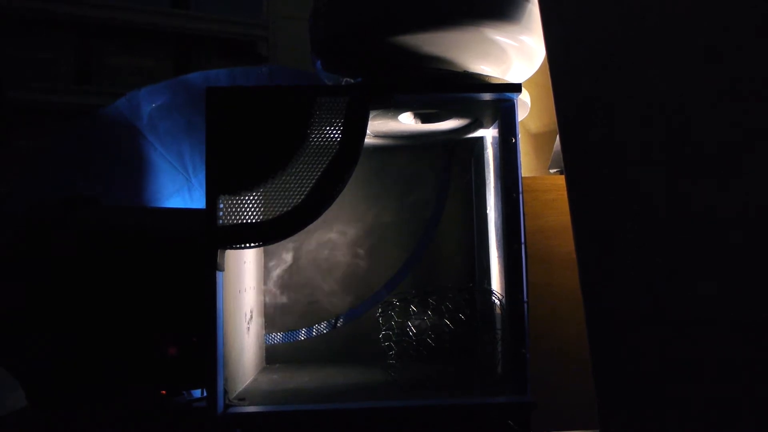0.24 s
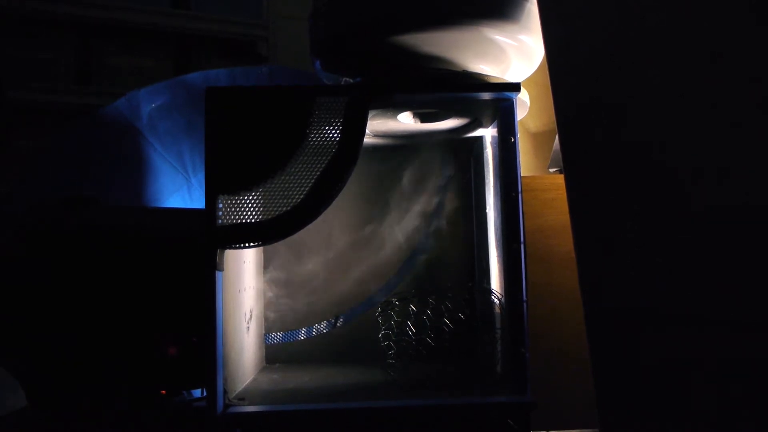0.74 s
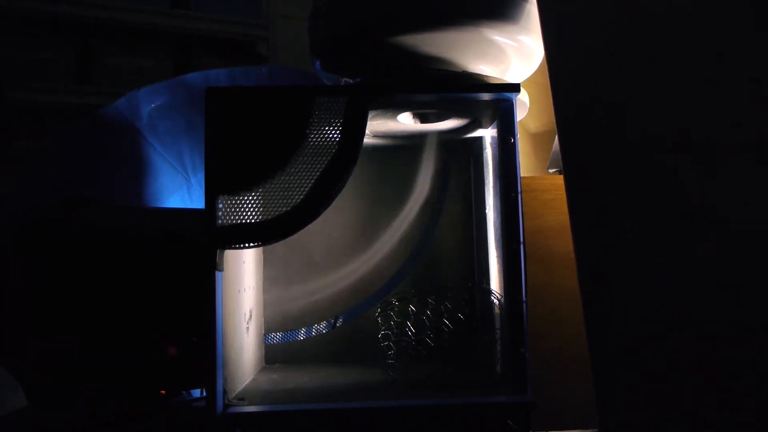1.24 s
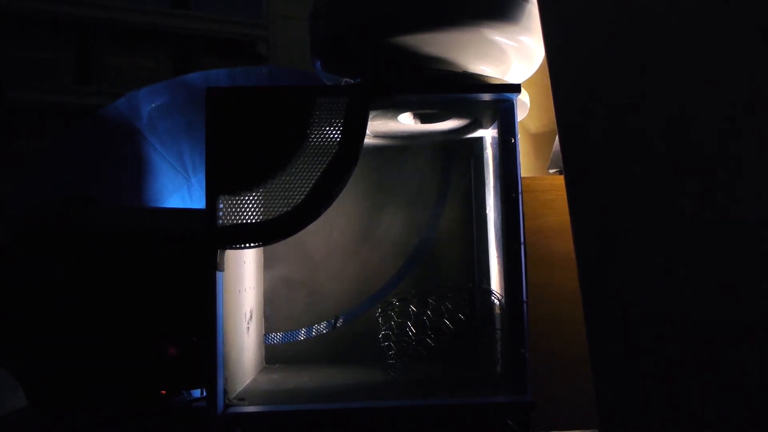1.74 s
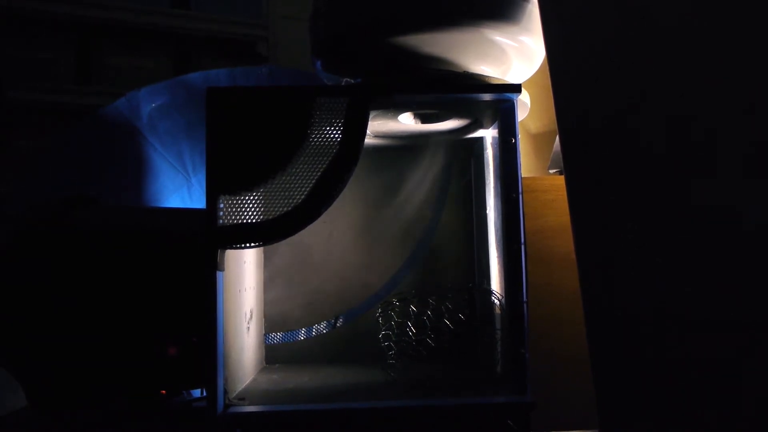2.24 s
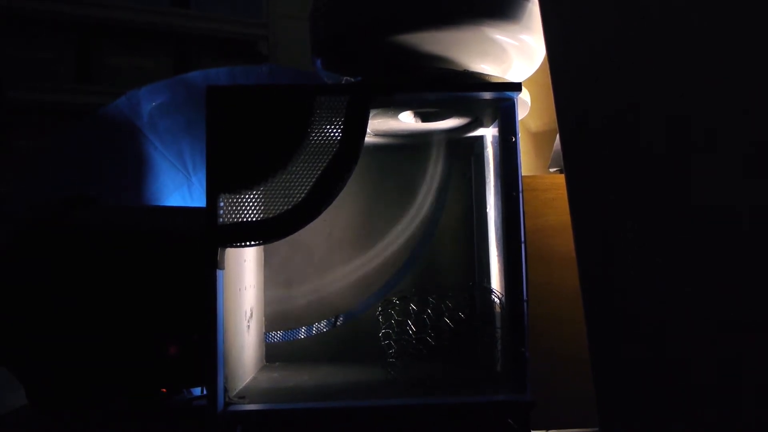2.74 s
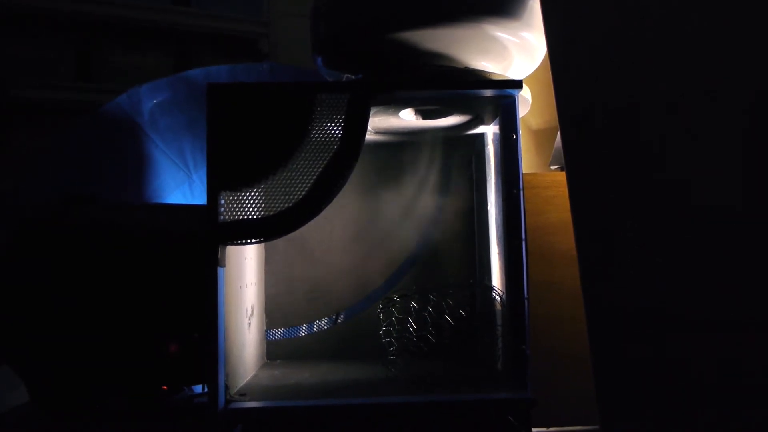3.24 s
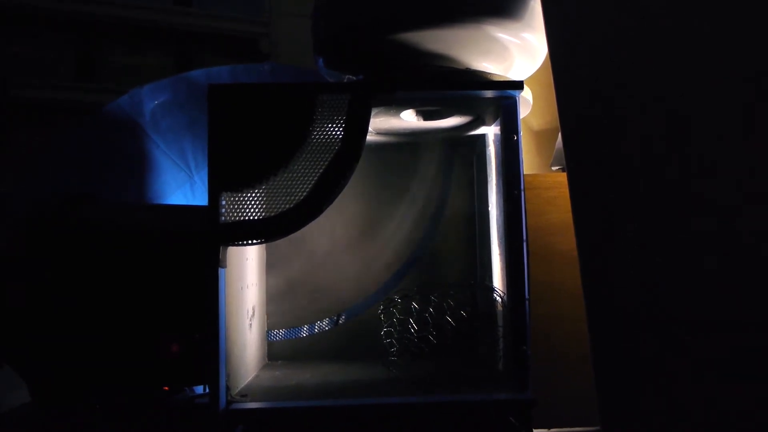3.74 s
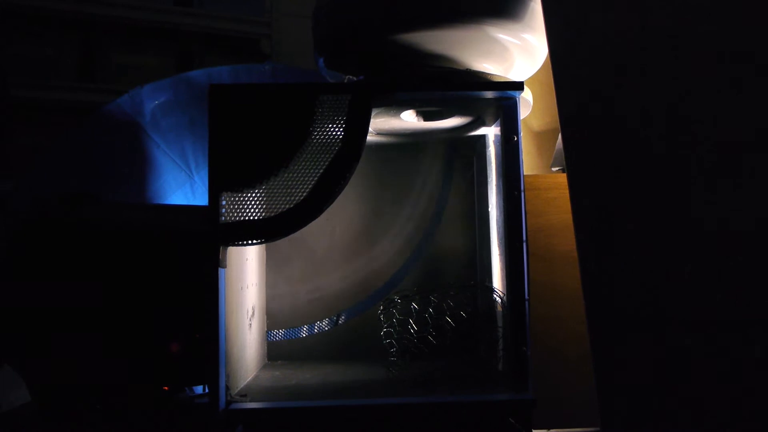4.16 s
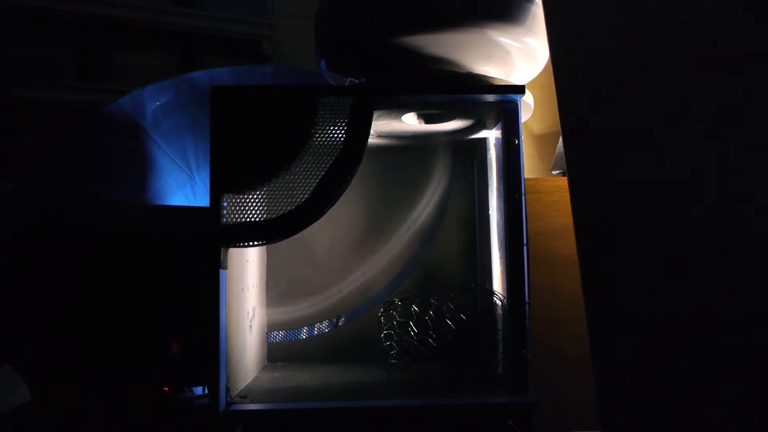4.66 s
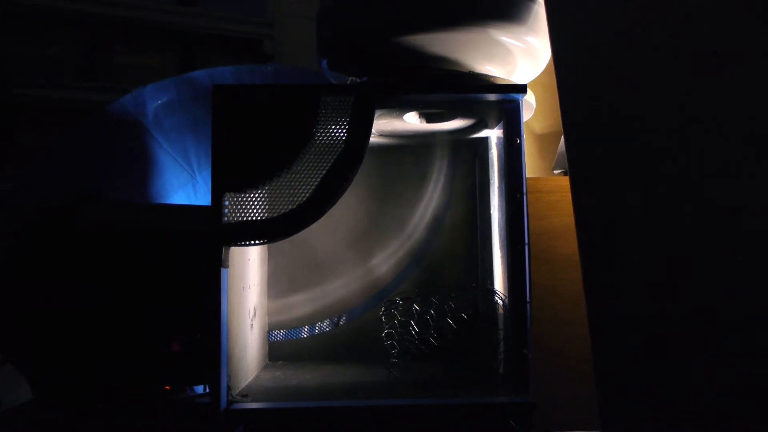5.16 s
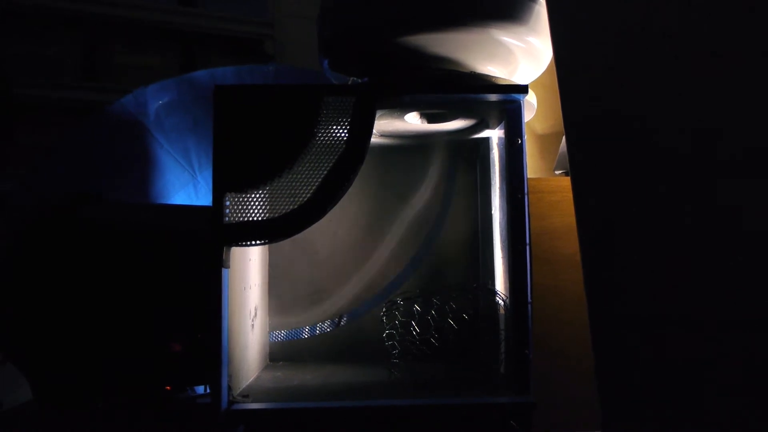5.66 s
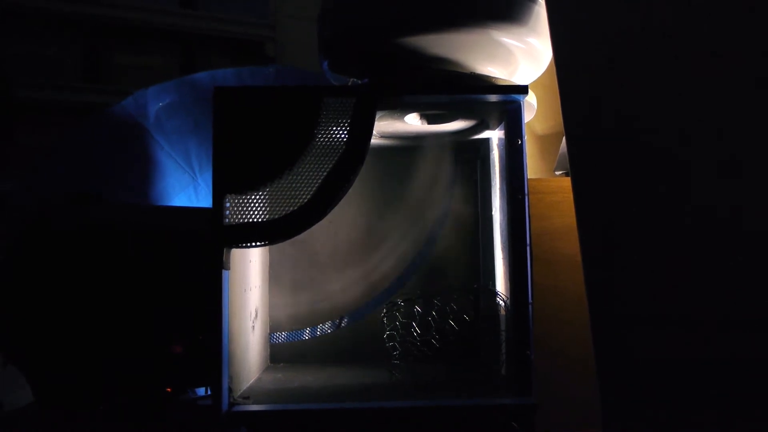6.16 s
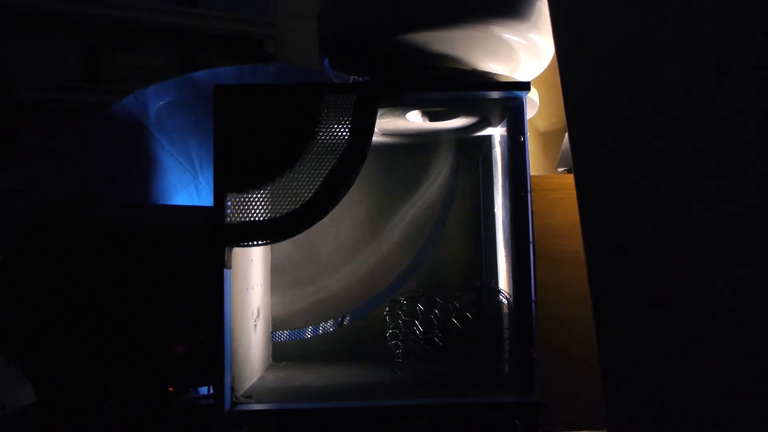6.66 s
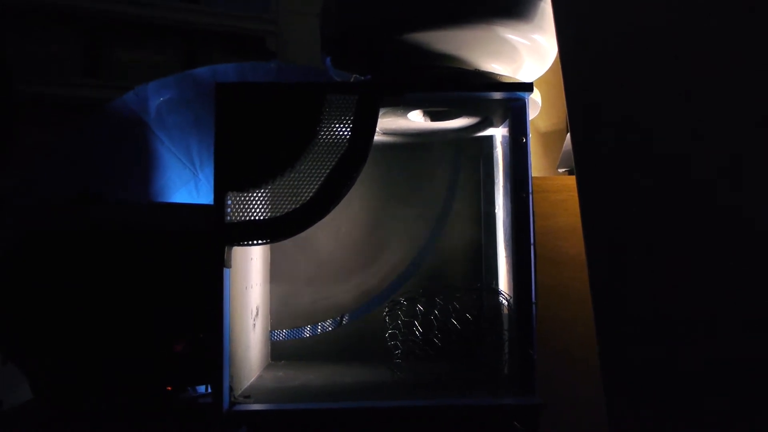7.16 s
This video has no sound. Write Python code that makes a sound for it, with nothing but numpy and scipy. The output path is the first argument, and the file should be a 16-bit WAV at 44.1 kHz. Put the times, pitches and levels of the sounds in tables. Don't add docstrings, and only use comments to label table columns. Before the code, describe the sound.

An inline duct fan spins up in a small quiet room, gliding motor hum giving way to rushing air and a low uneven throb.

```python
import sys
import numpy as np
from scipy import signal
from scipy.fft import rfft, irfft, next_fast_len
from scipy.io import wavfile
from scipy.ndimage import uniform_filter1d

SR = 44100
rng = np.random.default_rng(int(sys.argv[2]) if len(sys.argv) > 2 else 0)


def gain_from_db(level_db):
    decades = np.asarray(level_db, float) / 20
    return 10 ** decades


def wav_out(sig):
    wavfile.write(sys.argv[1], SR, np.round(np.clip(np.atleast_2d(sig).T, -1, 1) * 32767).astype(np.int16))


N = 326781
HZ = np.fft.rfftfreq(next_fast_len(N), 1 / SR)


def in_time(rows):
    s, *columns = np.transpose(rows)
    return [np.interp(np.arange(N) / SR, s, c) for c in columns]


def gain_at(points):
    hz, db = np.transpose(points)
    return gain_from_db(np.interp(np.log(HZ + 1), np.log(hz + 1), db))


def modes_power(modes):
    return sum(gain_from_db(2 * db) / (1 + ((HZ - hz) / width) ** 2) ** 2 for hz, width, db in modes)


def filtered(x, gain):
    return irfft(rfft(x, 2 * len(HZ) - 2) * gain)[..., :N]


def drift(rate_hz):
    r = np.exp(-80 * np.pi * rate_hz / SR)
    noise = rng.standard_normal(N // 40 + 2002)
    slow = signal.lfilter([1], [1, -2 * r, r * r], noise)[2000:]
    return np.interp(np.arange(N) / 40, np.arange(len(slow)), slow / slow.std())


def room_ripple(t60, wet_db):
    t = np.arange(SR // 2) / SR
    tail = rng.standard_normal(len(t)) * gain_from_db(-60 * t / t60)
    return 1 + gain_from_db(wet_db) * rfft(tail / np.linalg.norm(tail), 2 * len(HZ) - 2)


# pitch_hz, side_minus_mid_db
PORT_DIFFERENCE = [(30, -12), (70, -14), (125, -34), (200, -38), (280, -28), (500, -23), (800, -19),
                   (1300, -12), (2200, -5), (4000, -6), (8000, -4), (14000, -2.5)]


def air(gain):
    gains = np.array([gain, gain * gain_at(PORT_DIFFERENCE)])
    mid, side = filtered(rng.standard_normal((2, N)), gains)
    return np.array([mid + side, mid - side]) / mid.std()


# start_s, airflow_db
AIRFLOW_RISE = [(0, -55.5), (.6, -50), (1.2, -44), (2.2, -35), (3, -31), (3.7, -27.5), (4.9, -25),
                (6, -24.5), (7.41, -24.5)]


def follow(full_db, db_per_db):
    flow_db, = in_time(AIRFLOW_RISE)
    return gain_from_db(full_db + db_per_db * (flow_db + 24))


def bell(s, length_s):
    return np.exp(-((np.arange(N) / SR - s) / length_s) ** 2)


def surging(steady, rows, length_s):
    swells = sum((gain_from_db(row[1]) * bell(row[0], length_s)) ** 2 for row in rows)
    return np.sqrt(steady ** 2 + swells)


# start_s, shaft_hz, magnetic_pull_db
MOTOR_RUN_UP = [(0, 11.4, 0), (0.75, 17.55, 0), (1.2, 21.25, -5), (1.35, 22.5, -11), (2.6, 32, -25)]
# multiple_of_100_hz, shaft_multiple, level_db (rms before the housing)
MAGNETIC_TONES = [
    (2, 1, -45),
    (1, 1, -48),
    (1, -1, -56),
    (0, 21, -54),
    (0, 60, -55),
    (1, 60, -54.5),
    (2, 60, -58),
]
# pitch_hz, width_hz, level_db
HOUSING_MODES = [(86, 8, -3), (119, 6, 0), (215.5, 7, 0), (345, 35, 0), (430, 30, -1), (975, 42, 0)]


def motor():
    shaft_hz, pull_db = in_time(MOTOR_RUN_UP)
    mains = 2 * np.pi * 100 * np.arange(N) / SR
    shaft = 2 * np.pi * np.cumsum(shaft_hz) / SR
    glides = sum(gain_from_db(db + 1.8 * drift(4)) * np.sin(m * mains + k * shaft) for m, k, db in MAGNETIC_TONES)
    glides = filtered(gain_from_db(pull_db) * glides, np.sqrt(modes_power(HOUSING_MODES)))
    hum = gain_from_db(-53 + 3.2 * drift(0.89)) * np.sin(mains)
    return np.sqrt(2) * (glides + hum)


# pitch_hz, level_db (per Hz)
ROOM_SPECTRUM = [(30, -31), (60, 4.5), (100, -3), (200, 1.5), (350, -3.5), (500, 0), (700, -8), (1450, -45),
                 (1650, -9), (1900, -28), (3000, -49)]


def quiet_room():
    return gain_from_db(-52) * air(gain_at(ROOM_SPECTRUM))


# start_s, level_db (peak)
DRAUGHT_PUFFS = [(1.44, -68), (2.42, -68), (2.87, -64), (2.99, -60.9), (3.16, -62.9), (3.84, -62.3),
                 (4.06, -62), (4.64, -59.0), (4.89, -57.6), (5.51, -62), (6.28, -52), (6.74, -53.3)]


def draught():
    spectrum = gain_at([(5, -20), (15, -1), (40, 0), (60, -3), (100, -15), (140, -38)])
    ports = filtered(rng.standard_normal((2, N)), spectrum)
    ports = ports / ports.std()
    pressure = ports[0] + gain_from_db(-3) * ports[1] * [[1], [-1]]
    return surging(follow(-81, 0.35), DRAUGHT_PUFFS, length_s=0.048) * pressure


# pitch_hz, level_db (per Hz)
COARSE_CLOTH = [(2400, -25), (3100, -5), (3500, -1), (4200, -2), (5400, -9), (7000, -10), (9000, -25)]
# pitch_hz, level_db (per Hz)
SILKY_CLOTH = [(3000, -25), (6000, -1), (12000, -2), (15600, -6), (16500, -20)]
# start_s, level_db (peak)
CLOTH_SHIFTS = [(.08, -67), (.31, -69), (.56, -70), (.71, -68)]


def rustle():
    t = np.arange(N) / SR
    rub_s, rise_db_per_s, fall_db_per_s = 0.087, 90, 400
    rub_db = -56.5 - np.maximum(rise_db_per_s * (rub_s - t), fall_db_per_s * (t - rub_s))
    rest_s, fade_s = 0.83, 0.06
    moving = gain_from_db(-68.5) / (1 + np.exp((t - rest_s) / fade_s))
    silky = surging(moving, CLOTH_SHIFTS, length_s=0.054) * air(gain_at(SILKY_CLOTH))
    return gain_from_db(rub_db) * air(gain_at(COARSE_CLOTH)) + silky


# pitch_hz, width_hz, level_db
DUCT_MODES = [(267, 14, -3.4), (286, 29, -4.9), (331, 16, -2.0), (377, 13, -10.0), (407, 15, -11.0),
              (471, 24, -14.8), (519, 21, -8.6), (557, 8, -16.7), (596, 19, -4.7), (640, 17, -0.2),
              (688, 15, -0.6), (722, 11, -4.7), (762, 7, -8.9), (816, 15, -12.7), (857, 29, -13.0),
              (918, 16, -1.6), (977, 6, -7.9), (1010, 28, -6.3), (1047, 60, -13.9), (1113, 9, -11.7),
              (1168, 47, -12.9), (1207, 27, -11.3), (1258, 7, -16.1), (1342, 32, -7.5), (1399, 19, -9.4),
              (1439, 15, -11.7), (1507, 43, -16.1)]
# pitch_hz, width_hz, level_db
GRILLE_MODES = [(1623, 20, 0.2), (1672, 8, -7.5), (1748, 34, -2.3), (1802, 6, -5.4), (1818, 10, -5.2),
                (1868, 33, -5.7), (1945, 48, -7.4), (2075, 36, -6.2), (2151, 53, -12.5), (2241, 17, -11.2),
                (2296, 18, -9.4), (2353, 14, -12.8), (2435, 9, -7.1), (2504, 12, -3.0), (2596, 6, -15.4),
                (2775, 60, -10.9), (2902, 27, -8.1), (2992, 60, -12.7), (3092, 8, -12.2), (3212, 34, -19.9)]
# pitch_hz, width_hz, level_db
WHISTLE_MODES = [(3849, 15, -2), (6190, 80, -11)]
# pitch_hz, level_db (per Hz)
ROAR_SPECTRUM = [(200, -50), (440, -54), (790, -18.5), (1250, -23), (1580, -24), (1900, -57)]
# pitch_hz, level_db (per Hz)
RUSH_SPECTRUM = [(1300, -36), (1580, -28), (2000, -26), (2400, -12.5), (3100, -17.5), (3500, -24.5),
                 (4200, -52)]
# pitch_hz, level_db (per Hz)
HISS_SPECTRUM = [(2600, -16), (3250, -6), (3600, -5), (3950, -2.5), (4500, -4.5), (5500, -7.5),
                 (6300, -9.5), (7500, -16), (9500, -26), (12000, -46)]
# pitch_hz, level_db (per Hz)
FINE_SPECTRUM = [(4000, -30), (5500, -8), (7000, -2.5), (8500, -1), (10600, -3), (12000, -8.5),
                 (14000, -14), (15100, -18), (15200, -25), (15700, -22)]


def airflow():
    eddies = drift(5)
    roar = air(np.sqrt(gain_at(ROAR_SPECTRUM) ** 2 + modes_power(DUCT_MODES)))
    rush = air(np.sqrt(gain_at(RUSH_SPECTRUM) ** 2 + modes_power(GRILLE_MODES)))
    hiss_gain = np.sqrt(gain_at(HISS_SPECTRUM) ** 2 + modes_power(WHISTLE_MODES))
    hiss = air(hiss_gain * room_ripple(t60=0.22, wet_db=-10.5))
    fine = air(gain_at(FINE_SPECTRUM))
    hiss_level = np.hypot(follow(-37, 1.22), gain_from_db(-69))
    fine_level = np.hypot(follow(-43, 1.46), gain_from_db(-83))
    out = follow(-23.5, 1.01) * gain_from_db(0.1 * drift(5)) * roar
    out = out + follow(-36, 0.99) * gain_from_db(0.2 * eddies) * rush
    out = out + hiss_level * gain_from_db(0.25 * eddies) * hiss
    return out + fine_level * gain_from_db(0.51 * eddies) * fine


# pitch_hz, level_db (per Hz)
RUMBLE_SPECTRUM = [(26, -54), (45, -28), (70, -25.5), (125, 0), (160, -25), (280, -120)]
# start_s, level_db (peak)
HOUSING_SHUDDERS = [(1.59, -38), (2.35, -46), (2.96, -38), (3.28, -41.4), (3.56, -47.5), (3.79, -43),
                    (4.09, -33.5), (4.93, -36.3), (5.27, -34), (5.49, -38), (5.93, -38), (6.43, -33),
                    (6.72, -40), (7.06, -42)]


def rumble():
    return surging(follow(-40.5, 0.65), HOUSING_SHUDDERS, length_s=0.055) * air(gain_at(RUMBLE_SPECTRUM))


def smeared_beat(gain, pitch_hz, lock):
    smear_hz, evenness = 13, 0.7
    eddies = lock + drift(smear_hz) + 1j * drift(smear_hz)
    swell = uniform_filter1d(np.abs(eddies) ** 2, size=5000)
    eddies = eddies / (swell + 1e-2) ** (evenness / 2)
    tone = np.real(eddies * np.exp(2j * np.pi * np.cumsum(pitch_hz) / SR))
    return gain * tone / tone.std()


# start_s, level_db (peak), pitch_hz
LOWER_THROB = [(0.79, -50, 166.6), (0.91, -46, 161.5), (1.08, -45, 162.7), (1.4, -39.5, 160),
               (1.51, -43, 159.4), (1.63, -42, 165.3), (1.82, -35, 163.4), (2.12, -30.5, 164.5),
               (2.5, -28.2, 167), (2.82, -24.5, 161.7), (3.08, -22.5, 162), (3.22, -19, 165.7),
               (3.44, -23.5, 167), (3.74, -28, 172), (4.33, -23, 170), (4.99, -17, 168), (5.24, -20, 177.5),
               (5.39, -20, 183.5), (5.52, -31, 168), (6.2, -18.5, 173), (6.34, -22, 177.2),
               (6.58, -23.5, 166.1), (6.82, -23.5, 170), (7.27, -30, 169)]
# start_s, level_db (peak), pitch_hz
UPPER_THROB = [(1.21, -43.6, 215.5), (1.53, -43, 210), (1.74, -37.5, 215.2), (1.88, -37, 208.2),
               (2.02, -39, 217.1), (2.22, -44, 209.7), (2.38, -43, 216), (2.72, -32, 211.5),
               (3.04, -29, 216), (3.35, -25, 215), (3.58, -29, 210.6), (3.77, -25, 207), (3.92, -27, 211),
               (4.17, -22.5, 212), (4.28, -20.5, 214.8), (4.79, -20.3, 215), (5.14, -17.5, 214.3),
               (5.27, -20, 211.1), (5.98, -17.5, 208.3), (6.1, -17, 212.6), (6.34, -18, 209.6),
               (6.52, -23.5, 211.3), (6.72, -24, 214.5), (6.98, -15, 212), (7.18, -28, 214),
               (7.35, -33, 223)]
# pitch_hz, level_db
THROB_BAND = [(60, -36), (110, -28), (135, 1), (245, 0.5), (270, -10), (400, -40)]


def throb():
    stall_s, stall_db = 2.95, -27
    lower_gain = surging(follow(-27, 1), [*LOWER_THROB, (stall_s, stall_db)], length_s=0.075)
    upper_gain = surging(follow(-25.5, 1.15), UPPER_THROB, length_s=0.07)
    sag_hz = 22.3 * bell(stall_s, length_s=0.0598)
    lower_hz = in_time(LOWER_THROB)[1] - sag_hz
    upper_hz = in_time(UPPER_THROB)[1]
    lower_lock = 1.6 * bell(3.0, length_s=0.7)
    beat = smeared_beat(lower_gain, lower_hz, lower_lock) + smeared_beat(upper_gain, upper_hz, lock=0.35)
    band = gain_at(THROB_BAND)
    mid, side = filtered(beat, np.array([band, 1j * band * gain_at(PORT_DIFFERENCE)]))
    return np.array([mid + side, mid - side])


# start_s, level_db (peak)
CREAK_TIMES = [
    (1.8075, -55),
    (4.849, -39),
    (5.1494, -41),
    (5.9286, -44),
]


def creaks():
    envelope = np.zeros(N)
    for s, db in CREAK_TIMES:
        envelope += gain_from_db(db - 6) * bell(s + 0.006, length_s=0.011)
    spectrum = gain_at([(10000, -40), (12500, 0), (15000, 0), (16000, -20)])
    puff = filtered(rng.standard_normal((2, N)), spectrum)
    return envelope * puff / puff.std()


def scene():
    return motor() + quiet_room() + draught() + rustle() + airflow() + rumble() + throb() + creaks()


def roll_off(x):
    return signal.sosfilt(signal.butter(12, 15700, fs=SR, output="sos"), x)


def record(dry):
    return roll_off(dry)


dry = scene()
out = record(dry)
wav_out(out)
```